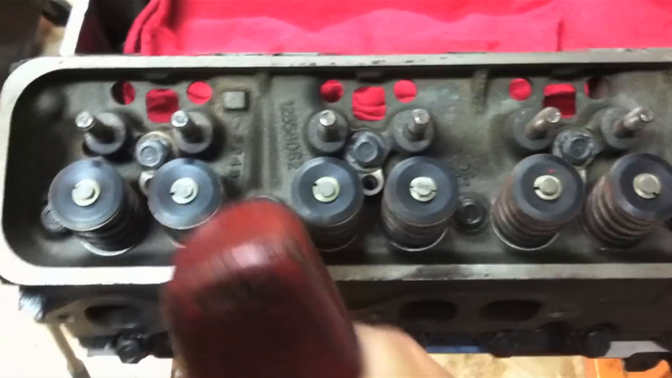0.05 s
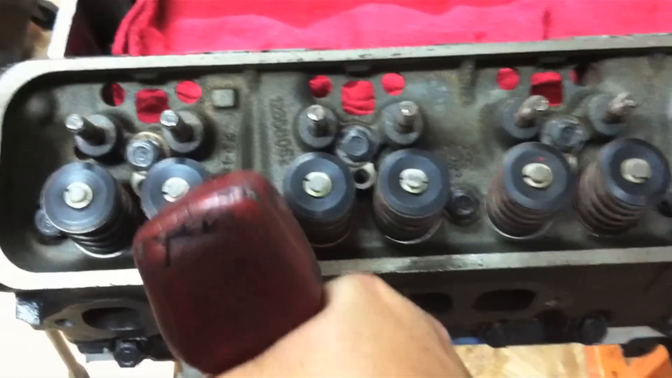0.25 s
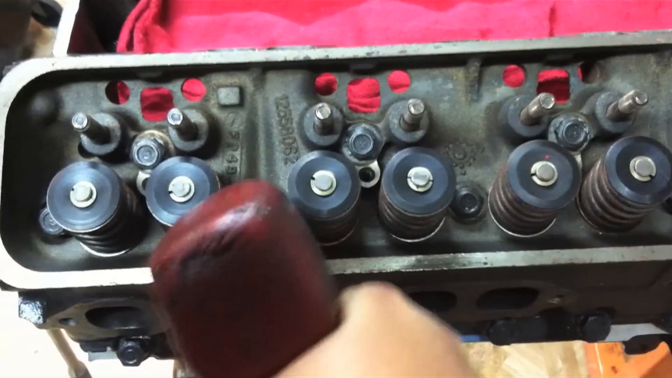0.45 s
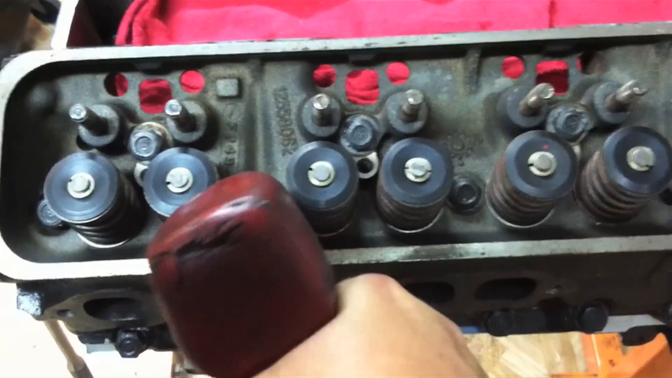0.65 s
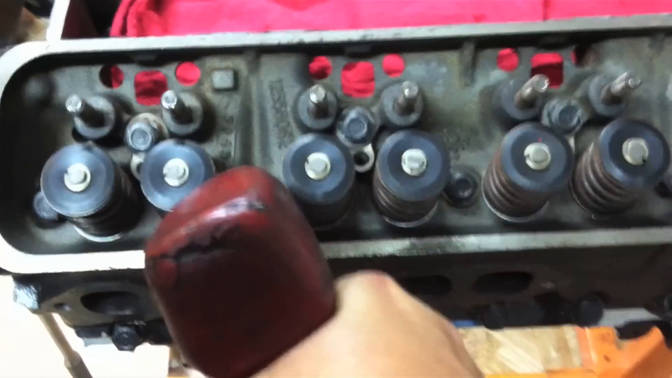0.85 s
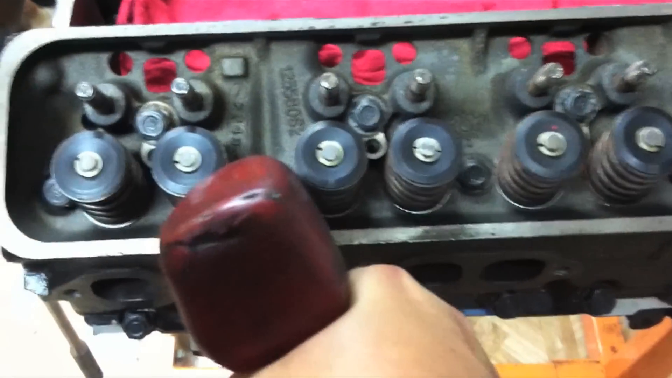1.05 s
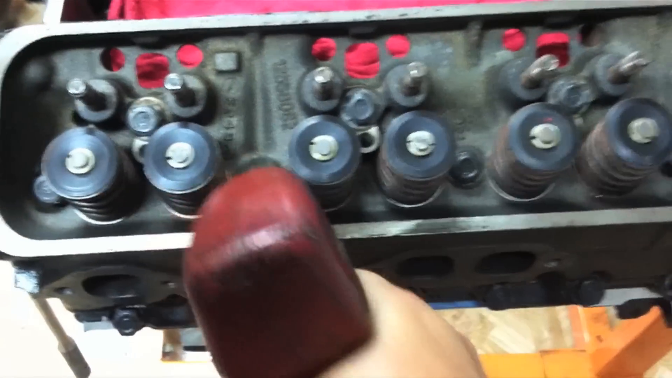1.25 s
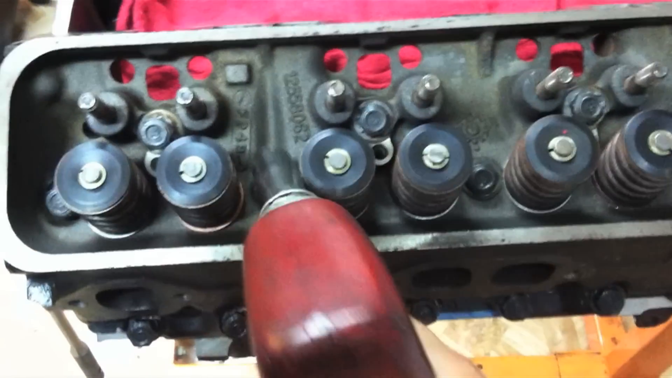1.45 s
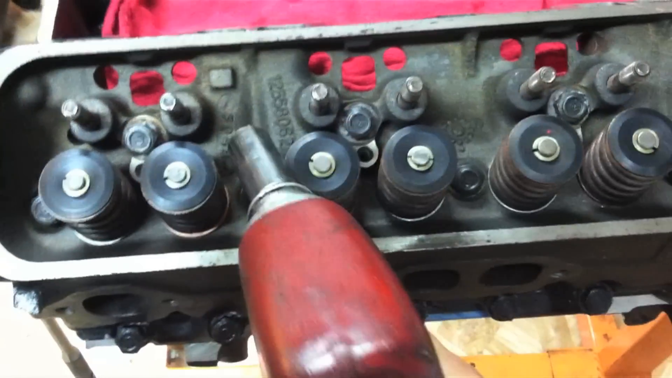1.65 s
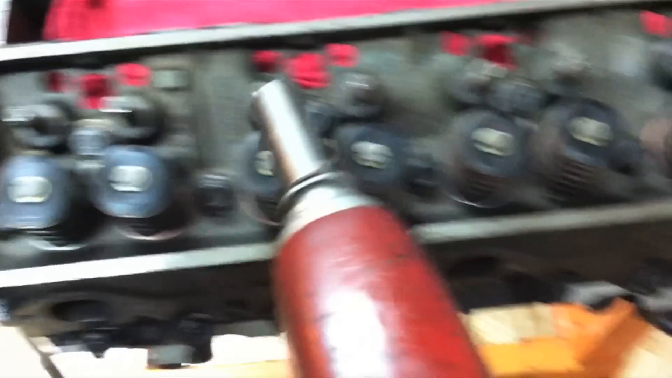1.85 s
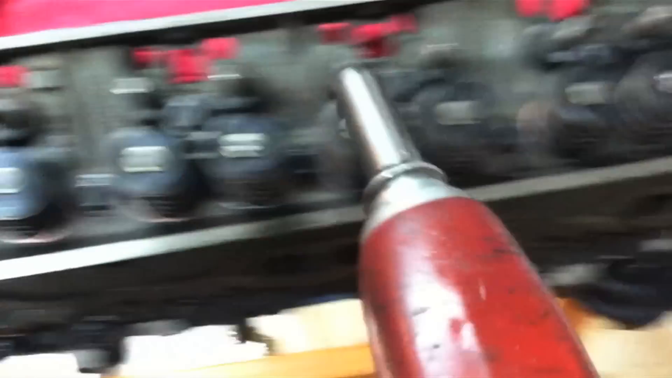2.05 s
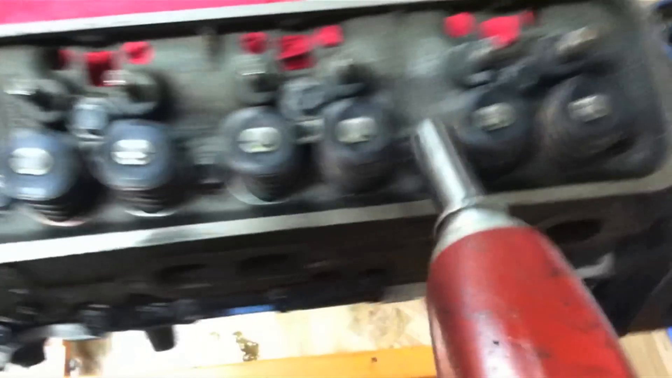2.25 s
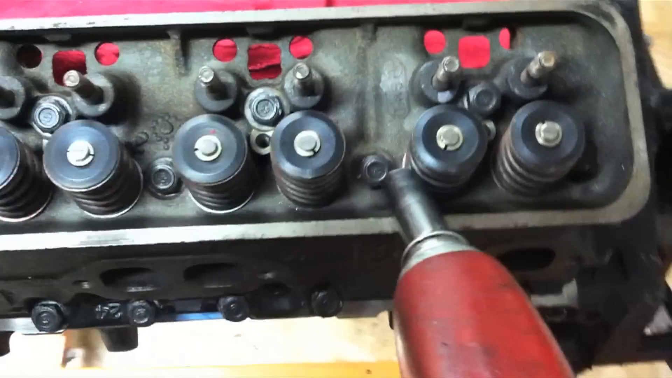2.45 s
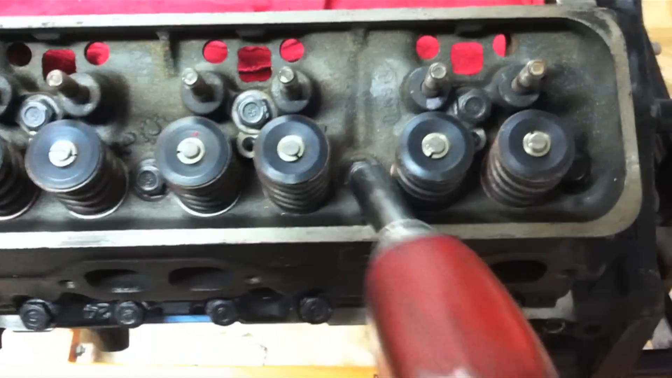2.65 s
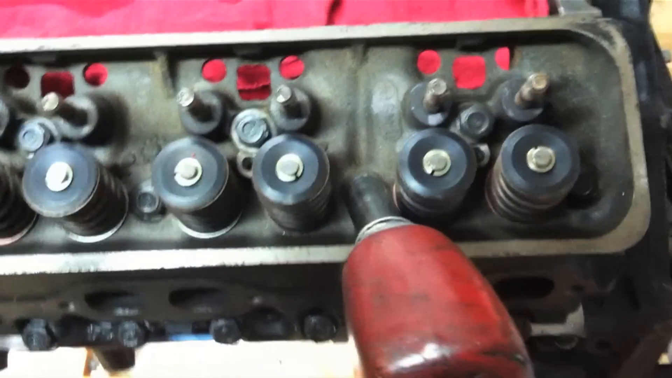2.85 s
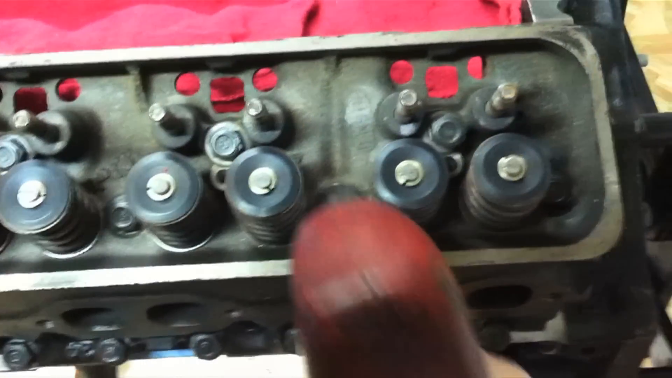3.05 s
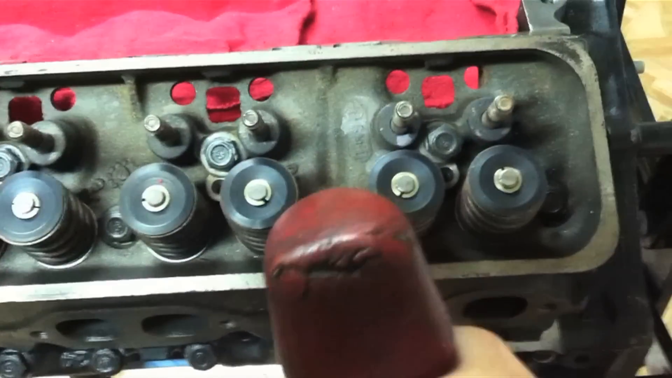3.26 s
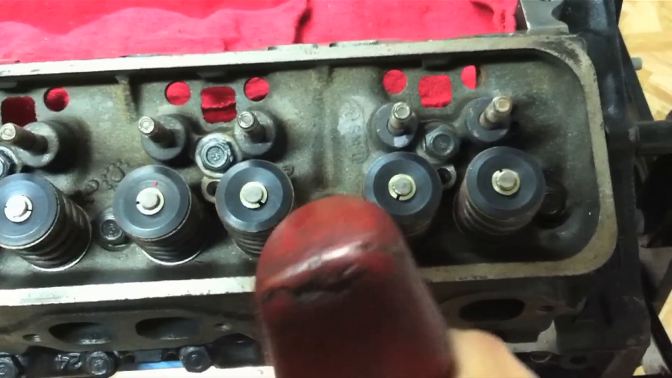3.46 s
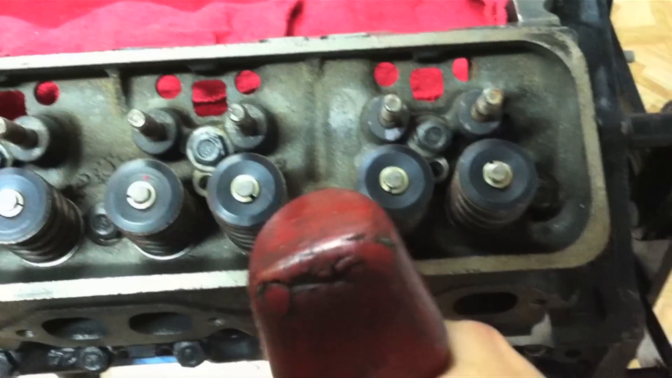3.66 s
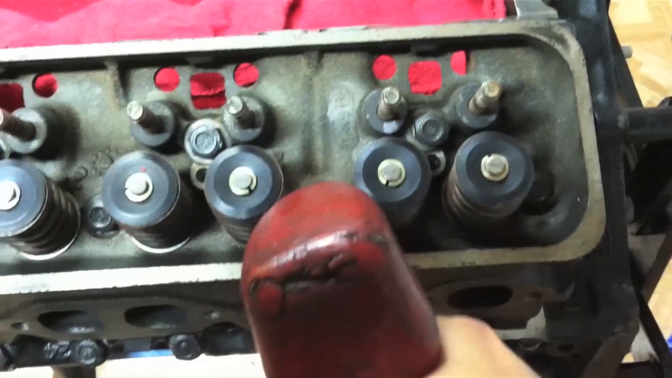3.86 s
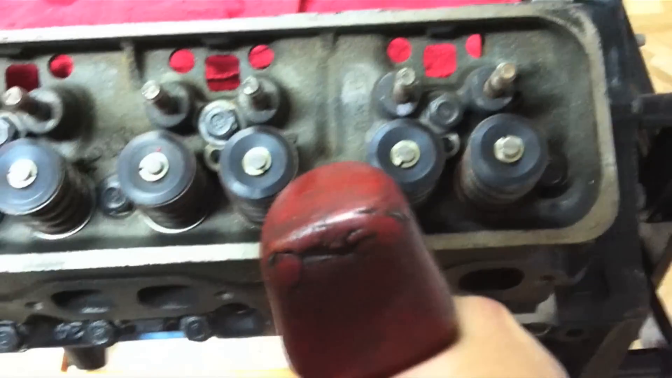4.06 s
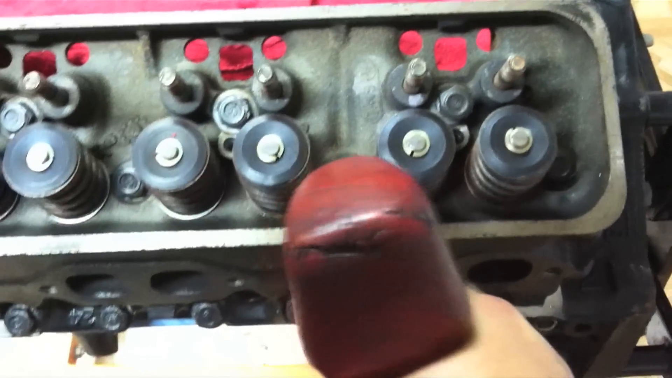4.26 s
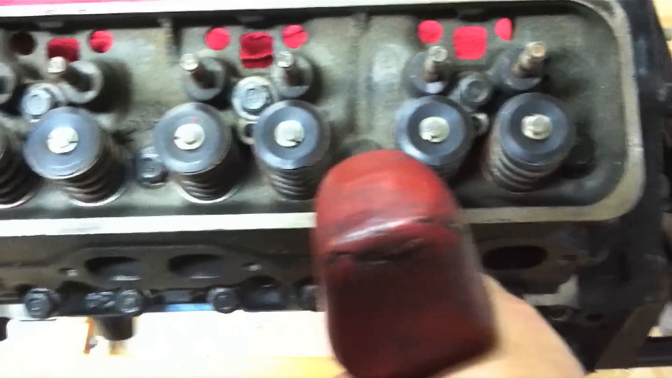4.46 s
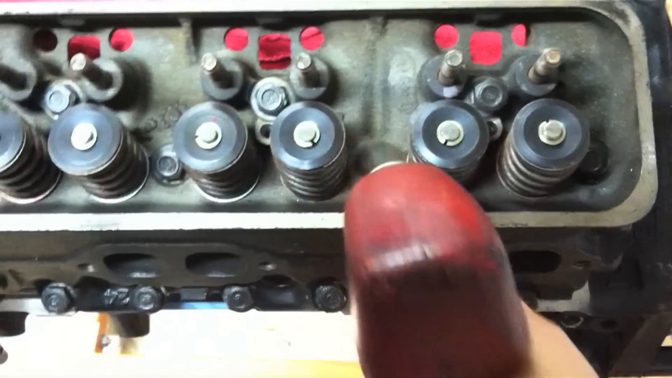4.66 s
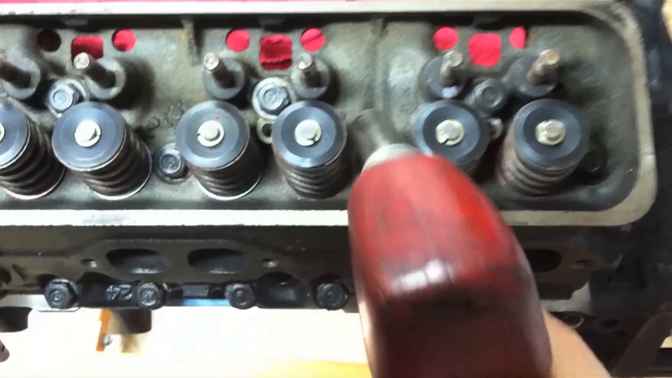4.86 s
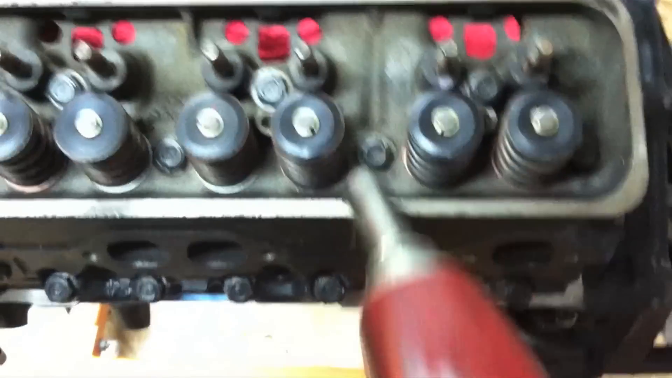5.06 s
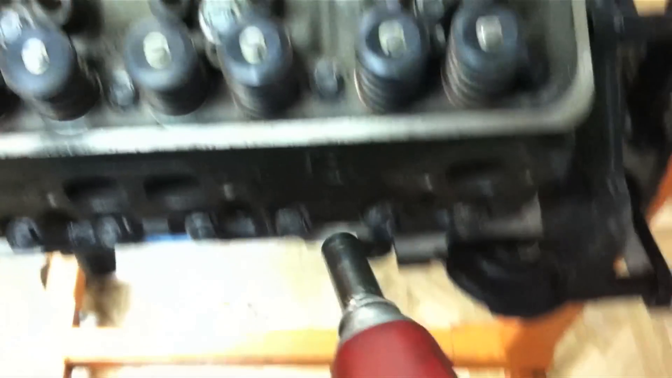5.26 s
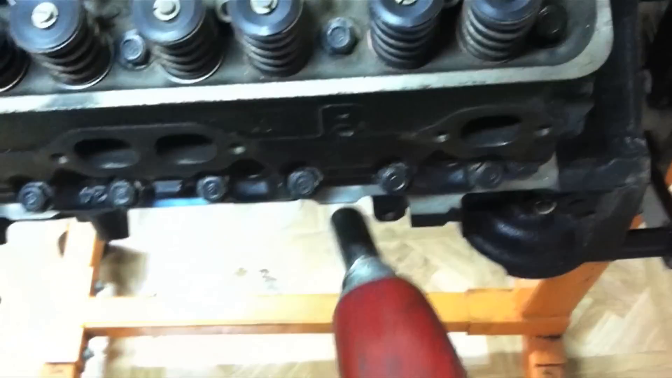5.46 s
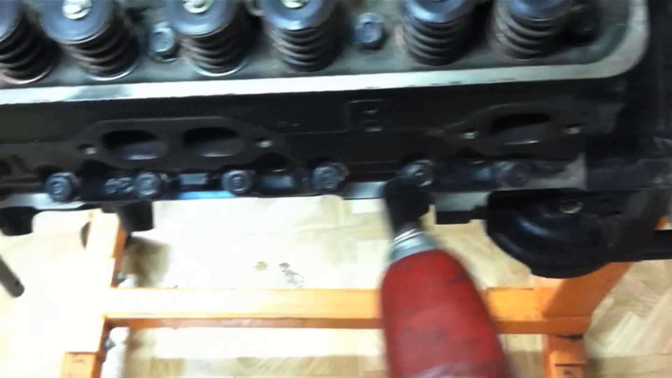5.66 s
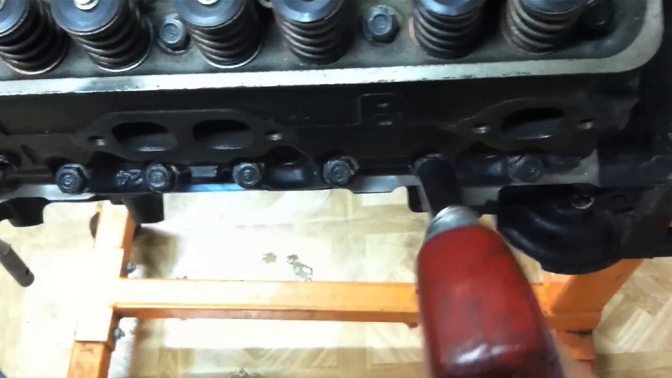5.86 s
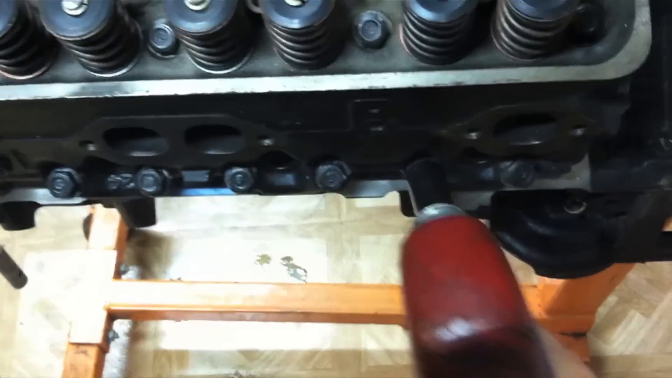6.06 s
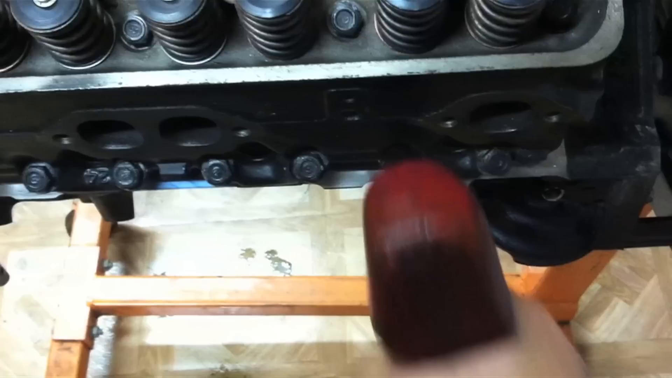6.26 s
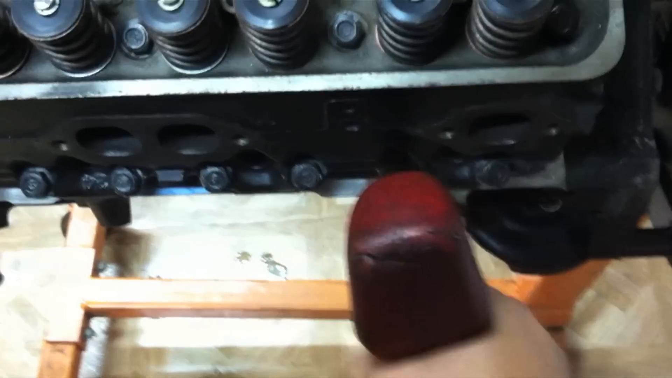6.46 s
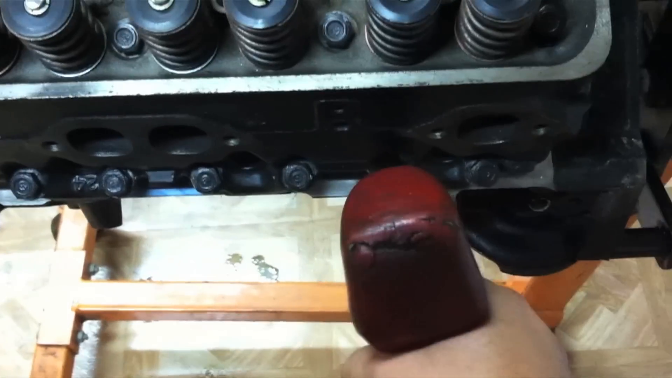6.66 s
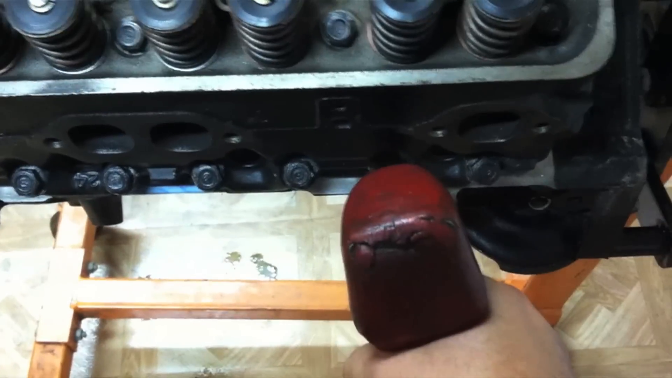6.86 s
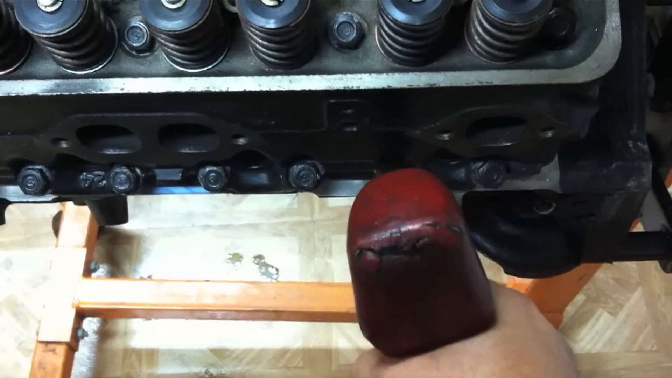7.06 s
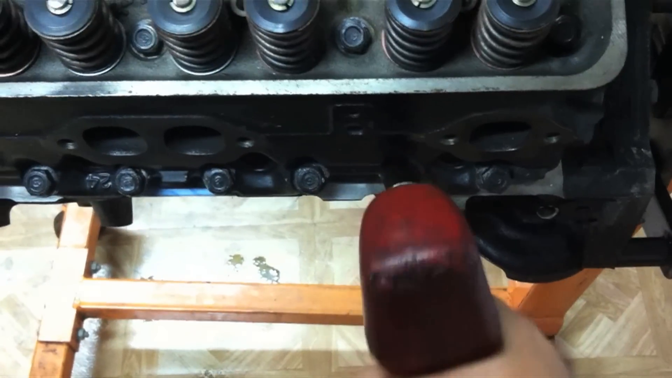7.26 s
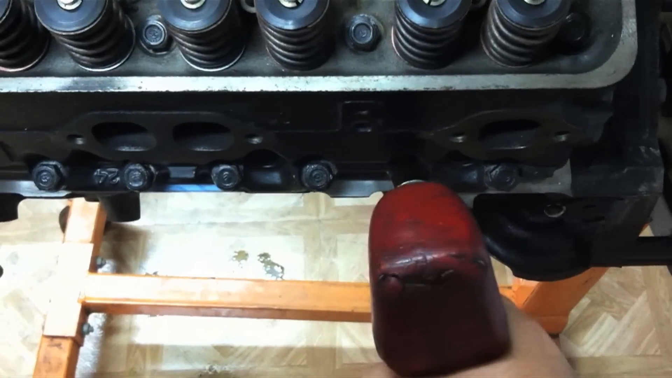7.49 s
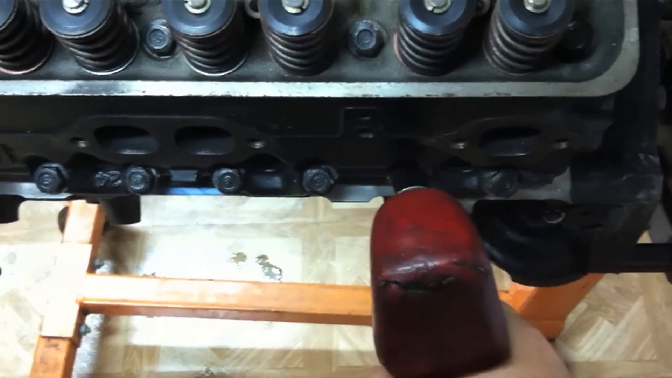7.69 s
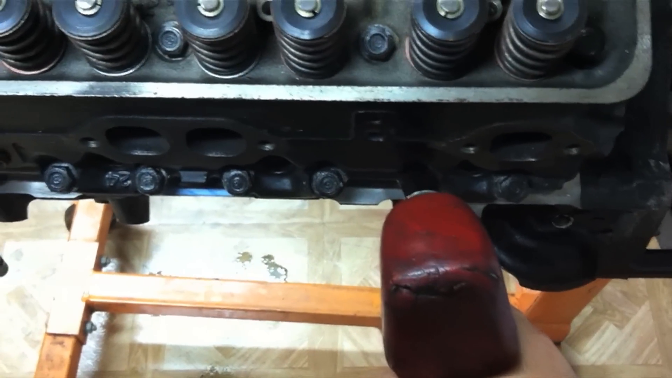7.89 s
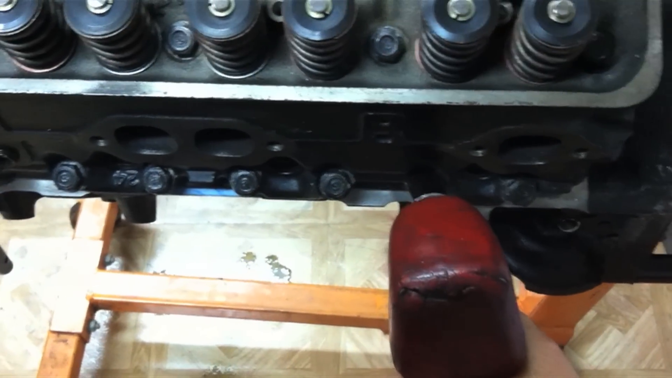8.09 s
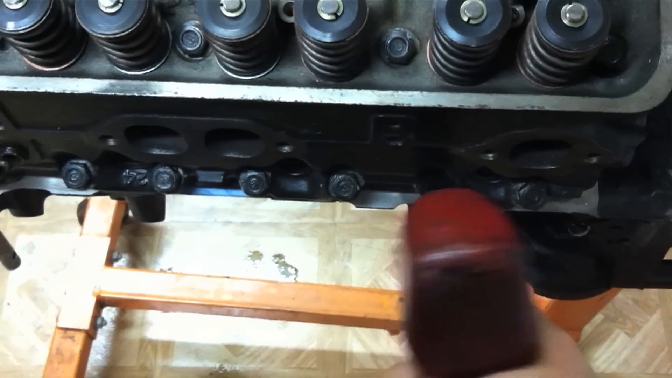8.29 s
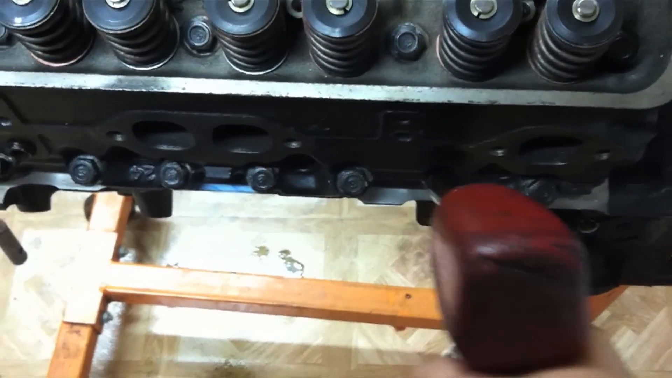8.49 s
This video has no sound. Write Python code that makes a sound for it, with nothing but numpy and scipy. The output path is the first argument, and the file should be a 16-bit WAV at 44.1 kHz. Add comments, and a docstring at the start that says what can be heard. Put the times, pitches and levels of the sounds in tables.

```python
"""Air wrench on three bolts

An air impact wrench works on three cylinder-head bolts in a garage, close to the microphone.
Each pull whirls up the vane motor, a wavering tone with a rush of exhaust, and the hammer rattles on the anvil.
The blows are short noise bursts and thuds; the valve springs and the room ring on after them.
Between bursts the socket clinks on iron, air seeps and the hose slides softly, over a low hum and rumble.
"""
import sys
import numpy as np
from scipy import signal
from scipy.fft import rfft, irfft
from scipy.io import wavfile

SR = 44100
rng = np.random.default_rng(int(sys.argv[2]) if len(sys.argv) > 2 else 0)


def transcribe(u):
    """Save the signal u as a 16-bit wav file named by the first command-line argument.

    u: samples, shape (n,) or (channels, n), limited to [-1, 1]; the rate is SR.
    q: integer samples, one column per channel.
    """
    v = np.clip(np.atleast_2d(u).T, -1, 1)
    q = np.round(v * 32767).astype(np.int16)
    wavfile.write(sys.argv[1], SR, q)


N = 376173
TIME = np.arange(N) / SR


def from_db(db):
    """Turn decibels into a gain."""
    return 10 ** (np.asarray(db) / 20)


def rms_one(x):
    """Scale to rms 1."""
    return x / np.sqrt(np.mean(x ** 2) + 1e-20)


def in_time(rows):
    """Read each column of a time curve at every sample."""
    s, *columns = np.transpose(rows)
    return [np.interp(TIME, s, c) for c in columns]


def at_hz(points, hz):
    """Read a curve over frequency, on a logarithmic frequency axis."""
    known_hz, values = np.transpose(points)
    return np.interp(np.log(np.maximum(hz, 1)), np.log(known_hz), values)


def convolve(x, response):
    """Pass x through an impulse response."""
    return signal.fftconvolve(x, response)[:N]


def coloured(x, spectrum, size=4096):
    """Filter that answers at once (minimum phase) with this spectrum; white noise keeps its level."""
    level_db = at_hz(spectrum, np.fft.rfftfreq(size, 1 / SR))
    cepstrum = irfft(np.log(from_db(level_db)))
    # folding the second half onto the first makes the filter causal
    cepstrum[1:size // 2] *= 2
    cepstrum[size // 2 + 1:] = 0
    response = irfft(np.exp(rfft(cepstrum)))
    return convolve(x, response / np.linalg.norm(response))


def noise():
    """White noise."""
    return rng.standard_normal(N)


def drift(per_s):
    """Random wandering with rms 1: straight lines between this many random points per second."""
    knots = np.arange(0, TIME[-1] + 1, 1 / per_s)
    return rms_one(np.interp(TIME, knots, rng.standard_normal(len(knots))))


def clicks(times, sizes):
    """One impulse per event."""
    out = np.zeros(N)
    places = np.round(np.asarray(times) * SR).astype(int)
    np.add.at(out, np.clip(places, 0, N - 1), sizes)
    return out


def crash(strikes, t60):
    """Each strike wakes a crowd of dense modes: noise that dies away."""
    keep = from_db(-60 / (t60 * SR)) ** 2   # share of the energy left after one sample
    energy = signal.lfilter([1], [1, -keep], strikes ** 2 + 1e-18)
    return np.sqrt(energy) * noise()


def resonance(x, hz, width_hz):
    """Two-pole band-pass with gain 1 at its peak."""
    r = np.exp(-np.pi * width_hz / SR)
    top = np.array([1, 0, -1]) * (1 - r * r) / 2
    bottom = [1, -2 * r * np.cos(2 * np.pi * hz / SR), r * r]
    return signal.lfilter(top, bottom, x + 1e-18)


# one pull of the trigger per bolt: (pressed [s], released [s], valve opening time [s],
# time until the hammer bites [s], and relative levels: air flow [dB], motor tone [dB],
# recoil [dB], socket ring [dB])
BURSTS = [(0.262, 1.103, .018, 0.15, -20, -35.5, -1.5, 1.5),
          (3.274, 4.193, 0.013, 0.13, -20, -35.5, -0.5, -1),
          (6.335, 7.063, 0.018, 0.12, -19.5, -36, 4.5, -8.5)]
# the speed that each bolt allows the motor as it tightens: (time [s], speed [vane passes per s])
LOAD_1 = [(.42,590),(0.488,540),(.57,600),(0.679,538),(.86,481),(.92,504),(1.1,465),(1.16,376),(1.3,360)]
LOAD_2 = [(3.451,598),(3.52,508.2),(3.59,559.3),(3.69,571.9),(3.91,464.5),(3.98,506.9),(4.07,474),(4.181,477.8),(4.3,430)]
LOAD_3 = [(6.49,602),(6.6,438.8),(6.68,487.7),(6.8,424),(6.88,458.6),(6.92,425),(6.97,469.4),(7.04,425.3),(7.2,433)]
# blows that stand out of the rattle, and the last ones as the rotor coasts:
# (time [s], relative crack level [dB], relative thud level [dB])
BLOWS = [(0.279,-22,-34.5), (0.312,-15.5,-16), (0.322,-14.5,-30), (0.5186,-14.5,-27.5),
         (0.7974,-15.5,-22.5), (0.8311,-20.5,-19), (0.8584,-18.5,-17.5), (0.8874,-17.5,-23),
         (1.079,-16,-23), (1.1213,-16.5,-34), (1.1496,-16,-41.5), (1.202,-27.5,-44), (3.309,-15,-19.5),
         (3.324,-17,-22), (3.585,-13,-26), (3.725,-19.5,-21.5), (3.7844,-14.5,-17), (3.8683,-15,-23),
         (3.9041,-15.5,-21), (3.9448,-19.5,-26), (3.9822,-15,-21.5), (4.0217,-23,-16.5), (4.0414,-13,-22),
         (4.1977,-17,-33), (4.218,-19.5,-20), (4.246,-23,-30), (4.288,-25,-37), (6.359,-18,-25.5),
         (6.376,-20,-15), (6.391,-14,-21), (6.5256,-25.5,-16.5), (6.5475,-15,-15), (6.6155,-17,-13.5),
         (6.6542,-23,-17.5), (6.665,-24.5,-17.5), (6.674,-16,-17), (6.7747,-20,-18.5), (6.7956,-24.5,-16),
         (6.8247,-19,-15), (6.982,-16,-19.5), (7.0062,-21,-16), (7.0207,-15,-15), (7.061,-15,-16),
         (7.0812,-13.5,-18)]
# the rotor spins up along an S-curve from the first speed (vane passes per s)
KICK_HZ, SPIN_UP_S, SPIN_UP_SHAPE = 134.9, .068, 2.5
FLUTTER, FLUTTERS_PER_S = .015, 45   # the motor's speed flutters at random, by this share
SURGE_DB = 4.5   # extra air until the hammer bites
# the tone is strong in the spin-up and again as the bolt comes tight
TONE_SURGE_DB, TONE_STRAIN_DB, STRAIN_S = 10, 5, 0.36
AIR_FADE_S, TONE_FADE_S = 0.022, .045   # fade after release
AIR_WAVER_DB, TONE_WAVER_DB, WAVERS_PER_S = 0.86, 3, 26


def burst(pull, load, bolt, free_air_db=5.5, loose_db=-6.5, slack_db=-9.0, tighten_s=.3):
    """One bolt: air surges before the hammer bites, then the recoil grows as the bolt tightens."""
    start, end, open_s, bite_s, air_db, tone_db, recoil_db, ring_db = pull
    age = np.maximum(TIME - start, 0)
    spin_up = 1 - np.exp(-(age / SPIN_UP_S) ** SPIN_UP_SHAPE)
    speed = KICK_HZ + (in_time(load)[0] - KICK_HZ) * spin_up
    flutter = 1 + FLUTTER * drift(FLUTTERS_PER_S)
    vanes = np.cumsum(speed * flutter * (TIME > start)) / SR   # vane passes so far

    unloaded = np.exp(-(age / bite_s) ** 4)   # 1 while spinning up, 0 once the hammer works
    strain = np.exp(-np.abs(TIME - end) / STRAIN_S)
    flow_db = air_db + SURGE_DB * unloaded + AIR_WAVER_DB * drift(WAVERS_PER_S)
    flow = trigger(start, end, open_s, AIR_FADE_S) * from_db(flow_db)
    whirl_db = tone_db + TONE_SURGE_DB * unloaded + TONE_STRAIN_DB * strain
    whirl_db = whirl_db + TONE_WAVER_DB * drift(WAVERS_PER_S)
    tone = trigger(start, end, open_s, TONE_FADE_S) * from_db(whirl_db)
    grip = from_db(recoil_db + slack_db * np.exp(-age / tighten_s))

    own_blows = np.array([blow for blow in BLOWS if start - .5 < blow[0] < end + .5])
    air = motor(vanes, flow * from_db(free_air_db * unloaded), tone)
    blow_force = flow * from_db(loose_db * unloaded)   # the hammer is still loose at first
    return air + hammer(vanes, blow_force, grip, own_blows, bolt, ring_db)


LEAK_DB = -31   # level at which the valve starts to open


def trigger(start, end, open_s, fade_s):
    """The air valve opens from a leak and stays open for the burst; then what it drives fades out."""
    opening = from_db(LEAK_DB * np.exp(-np.maximum(TIME - start, 0) / open_s))
    return (TIME > start) * opening * np.exp(-np.maximum(TIME - end, 0) / fade_s)


# colour of the exhaust rush: (frequency [Hz], level [dB per Hz])
EXHAUST = [(59, -50), (100, -20), (271, -13), (349, -6), (580, -4), (702, -7), (814, -9.5), (886, -13),
           (4070, -0.5), (5840, -7.5), (10600, -5), (12500, -14.5), (15800, -33.5)]


def motor(vanes, flow, tone, rush_db=-8.0, chop=0.35, tone_db=-3.0, second_db=-9.0, third_db=-19.5,
          rough=0.4, body_hz=320, body_width_hz=110):
    """The vanes chop the exhaust: a wavering tone and a pulsing rush of air."""
    angle = 2 * np.pi * vanes + rough * drift(150)
    hum = np.sin(angle) + from_db(second_db) * np.sin(2 * angle) + from_db(third_db) * np.sin(3 * angle)
    rush = coloured(noise() * flow * (1 + chop * np.cos(angle)), EXHAUST)
    whirl = from_db(tone_db) * tone * np.sqrt(2) * hum * (1 + rough * drift(90))
    # the rising tone sweeps through the housing's resonance
    groan = resonance(resonance(whirl, body_hz, body_width_hz), body_hz, body_width_hz)
    return from_db(rush_db) * rush + whirl + groan


# clatter of tool, socket and head on each bolt: (frequency [Hz], level [dB per Hz])
BOLT_1 = [(290, -31.5), (500, -3), (630, -18), (841, -7), (1030, -6), (1460, -6.5), (2960, -1.5),
          (3180, -3.5), (4760, 0), (5660, -4.5), (7140, -6), (11300, -10.5), (12200, -6.5), (14500, -20),
          (15800, -31)]
BOLT_2 = [(290, -38), (500, -3.5), (639, -17.5), (805, -7), (986, -4), (1730, -4), (3040, -0.5), (3320, -1),
          (4690, 0.5), (5270, -3.5), (7140, -3.5), (8250, -8), (12500, -6.5), (14700, -19), (15800, -27)]
BOLT_3 = [(290, -29), (500, -8), (829, -8.5), (1460, -5), (1810, -5.5), (2180, -3), (2490, -5),
          (4560, -2.5), (5120, 0.5), (5830, -4), (6640, -1.5), (8370, -8), (9260, -5.5), (12500, -8),
          (15800, -27)]


def hammer(vanes, flow, grip, blows, bolt, ring_db, jitter_s=0.00054, spread_db=2.0, light_db=2.5,
           weak_db=-2.0, hard_db=2.5, t60=0.024, rebound_s=0.003, rebound_db=-2.0, light_thud_db=-16.5,
           bite_share=.45, bite_db=3.0, bite_thud_db=-6.5, thud_spread_db=2.5):
    """A blow falls every fourth vane pass; some bite harder and kick the tool, every third only glances."""
    at = np.flatnonzero(np.diff(vanes // 4) > 0)
    chance = rng.standard_normal((len(at), 4))
    s = at / SR + jitter_s * chance[:, 0]
    hard_s, crack_db, thud_db = blows.T
    # regular blows leave room (6 ms) for the listed ones
    free = np.abs(s[:, None] - hard_s).min(axis=1) > .006
    glancing = np.arange(len(at)) % 3 == 0
    bites = ~glancing & (rng.random(N)[at] < bite_share)

    size = free * flow[at] * from_db(spread_db * chance[:, 1] + weak_db * glancing)
    first = clicks(s, size * from_db(light_db + bite_db * bites))
    first = first + clicks(hard_s, from_db(crack_db + hard_db))
    # regular blows that do not bite rebound once
    rebound_times = s + rebound_s * from_db(2 * chance[:, 2])
    rebound = clicks(rebound_times, size * ~bites * from_db(rebound_db))
    steel = socket_ring(coloured(crash(first + rebound, t60), bolt), ring_db)

    kick_db = np.where(bites, bite_thud_db, light_thud_db) + thud_spread_db * chance[:, 3]
    kicks = clicks(s, size * grip[at] * from_db(kick_db)) + clicks(hard_s, from_db(thud_db))
    return steel + thud(kicks)


# resonances of socket and anvil: (frequency [Hz], width [Hz], relative level [dB])
SOCKET = [(2880, 44, -10), (4020, 62, -9), (4880, 180, -9.5), (7100, 200, -12.5), (9400, 150, -18.5),
          (12100, 200, -6.5)]


def socket_ring(x, ring_db):
    """The steel socket adds its own short resonances."""
    return x + sum(from_db(db + ring_db) * resonance(x, hz, width) for hz, width, db in SOCKET)


# colour of the thud of a blow through the tool body: (frequency [Hz], level [dB per Hz])
THUD = [(30,-42),(60,-24.5),(100,-10),(160,1),(320,-1.5),(500,-4),(900,-11.5),(1600,-16.5),(4000,-38.5)]


def thud(strikes, push_db=17.5, shake_db=-3.5, t60=.035):
    """The recoil is one push on the tool body, which then shakes briefly."""
    return coloured(from_db(push_db) * strikes + from_db(shake_db) * crash(strikes, t60), THUD)


# the socket touches bolt or head: (time [s], relative strength [dB],
# knock relative to that strength [dB], brightness limit [Hz])
TOUCHES = [(0.1477,-10.5,-10,11900),(2.4326,-31,-26,12000),(2.5624,-43.5,-17,12000),(2.6442,-34.5,-19.5,11930),(2.656,-35.5,-22.5,8954),(2.6804,-30.5,-30,12000),(2.725,-41,-23,8980),(3.0079,-36.5,-20,10930),(3.02,-43,-23,9040),(3.1137,-18,-14.5,11980),(3.1202,-27.5,-20,8940),(5.8245,-40,-22.5,14260),(5.873,-39,-23,14030),(5.908,-44,-20,11040),(6.2857,-25.5,-3,9070),(8.089,-46,-18,2570),(8.2766,-49,-15,5900),(8.3247,-40,-17.5,2386)]
# colour of the clink: (frequency [Hz], level [dB per Hz])
CLINK = [(150,-14),(350,4),(800,-2.5),(1400,-2.5),(2400,0.5),(4600,0.5),(6000,-7.5),(8000,-7.5),(10500,-13),(12300,-11.5),(13300,-17),(15500,-30.5)]
# the socket's own high ping when it is tapped
PING_HZ, PING_WIDTH_HZ, PING_DB = 12300, 60, 13.0


def socket_touches(clink_db=-8.5, knock_db=-3.5, t60=0.031, firm_db=-20.0, longer_per_db=0.3,
                   knock_low_hz=130):
    """Steel meets iron: a clink, shorter when the touch is soft, with a ping and a knock under it."""
    clink = 0
    for s, strength_db, rel_db, bright_hz in TOUCHES:
        dull = signal.butter(2, min(bright_hz, .45 * SR), fs=SR, output="sos")
        lasts = t60 * from_db(longer_per_db * (strength_db - firm_db))
        strike = clicks([s], from_db(strength_db + clink_db))
        clink = clink + signal.sosfilt(dull, crash(strike, lasts))
    clink = coloured(clink, CLINK)
    ping = from_db(PING_DB) * resonance(clink, PING_HZ, PING_WIDTH_HZ)

    s, strength_db, rel_db, bright_hz = np.transpose(TOUCHES)
    knock = thud(clicks(s, from_db(strength_db + rel_db + knock_db)))
    low_cut = signal.butter(2, knock_low_hz, "high", fs=SR, output="sos")
    return socket_ring(clink, ring_db=-5.5) + ping + signal.sosfilt(low_cut, knock)


# how strongly the springs' crowd of modes rings: (frequency [Hz], level [dB])
SPRINGS = [(1800,-16),(2300,-0.5),(2550,2),(2800,-0.5),(3400,-5),(3900,-5),(4300,-12),(4950,-4.5),(5350,-5.5),(5650,4),(6000,1.5),(6400,-13),(7900,-3.5),(12000,-21)]
# the springs' clearest notes: (frequency [Hz], level [dB], time to fall 60 dB [s])
SPRING_NOTES = [(2315,-3,1.5),(2396,-5,1.5),(2552,-0.5,1.4),(2600,-5,1.3),(3036,-5.5,1.4),(3386,-6,1.2),(3880,-0.5,1.1),(4940,-9,1.4),(5600,-7.5,1.5),(5733,-5.5,1.5),(5911,-4,1.6),(7736,-8.5,1.4)]


def valve_springs(x, crowd_db=-29.0, t60=1.5):
    """Shaken through the head, the springs sing on: a few clear notes in a crowd of modes."""
    t = TIME[:SR * 2]
    ring = rng.standard_normal(len(t)) * np.exp(-np.log(1000) * t / t60)
    crowd = coloured(convolve(x, ring / np.linalg.norm(ring)), SPRINGS)
    notes = 0
    for hz, db, decay_s in SPRING_NOTES:
        width_hz = np.log(1000) / np.pi / decay_s   # a longer ring is a narrower resonance
        notes = notes + from_db(db) * resonance(x, hz, width_hz)
    return from_db(crowd_db) * crowd + notes


# how long the garage echoes; a negative time makes the echo swell: (frequency [Hz], time for 60 dB [s])
ROOM_T60 = [(150,-0.1),(400,1),(1000,0.46),(2800,0.9451),(7000,.5),(14000,0.41)]
# how loud the echo is: (frequency [Hz], level [dB per Hz])
ROOM_DB = [(100,-25),(250,-15),(450,-12),(1000,-8),(3000,-7),(6000,-4),(10000,-3.5),(15000,-10.5)]


def garage(x, first_echo_s=0.0029, count=12):
    """Diffuse 2 s echo with its own rate in each band: most die away, the lowest swell until it ends."""
    t, response = TIME[:SR * 2], 0
    edges = np.geomspace(80, 16000, count + 1)
    for low, high in zip(edges, edges[1:]):
        hz = np.sqrt(low * high)
        fade = (t > first_echo_s) * np.exp(-np.log(1000) * t / at_hz(ROOM_T60, hz))
        echoes = rng.standard_normal(len(t)) * fade / np.linalg.norm(fade)
        band = signal.butter(2, [low, high], "band", fs=SR, output="sos")
        response = response + from_db(at_hz(ROOM_DB, hz)) * signal.sosfilt(band, echoes)
    return convolve(x, response)


# air seeps past the half-pressed trigger before a burst: (start time [s], level [dB])
SEEPS = [(0.152, -40.5), (3.118, -49)]
# colour of the seeping air: (frequency [Hz], level [dB per Hz])
SEEP = [(150,-14),(330,1),(850,-3),(1200,-10),(1600,-4),(2100,-10),(3200,2),(4500,-2),(5800,-13),(7600,-8),(12000,-16),(15500,-32)]
SEEP_FADE_S = .12


def seep():
    """A soft hiss of escaping air that dies down as the tool is settled on the bolt."""
    level = sum(from_db(db) * (TIME > s) * np.exp(-np.abs(TIME - s) / SEEP_FADE_S) for s, db in SEEPS)
    return level * coloured(noise(), SEEP)


# the air hose slides as the tool is carried about: (middle time [s], half length [s], level [dB])
SLIDES = [(0.11,0.025,-68), (1.89,0.11,-68.5), (2.065,.04,-67.5), (2.584,.13,-70.5), (2.92,.25,-68.5),
          (5.267,.13,-70.5), (5.501,0.21,-80), (6.23,.03,-74)]
# colour of the hiss of hose and background: (frequency [Hz], level [dB per Hz])
HISS = [(1500,-9.5),(2500,4.5),(5000,0),(6500,-4),(10500,-6.5),(12800,-10),(13800,-20.5),(15500,-30.5)]


def hose():
    """Each slide is a soft hiss that swells and fades."""
    level = sum(from_db(db) * np.exp(-((TIME - s) / half_s) ** 2) for s, half_s, db in SLIDES)
    return level * coloured(noise(), HISS)


# colour of the background rumble: (frequency [Hz], level [dB per Hz])
RUMBLE = [(15, -67), (25, -35), (32, -43.5), (62, -24), (154, -7.5), (271, -2.5), (309, -4.5), (373, 2.5),
          (404, -7), (2240, -21.5), (3180, -36.5), (4870, -38.5), (5720, -37.5), (9020, -40), (15000, -55)]
# notes of the hum: (frequency [Hz], level [dB])
HUM = [(163,-71.5),(188.4,-75),(376.8,-70.5),(759,-81.5),(900,-80.5)]
RUMBLE_LEVEL_DB, HISS_LEVEL_DB, SINK_DB, RECOVER_DB_PER_S = -57.0, -82.5, 7, 3.5


def background(waver=.6):
    """Low rumble, faint hiss and a wavering hum; rumble and hiss sink in each burst, then creep back."""
    sinks = []
    for start, end, *_ in BURSTS:
        left_db = np.clip(SINK_DB - RECOVER_DB_PER_S * (TIME - end), 0, SINK_DB)
        sinks.append((TIME > start) * left_db)
    sunk_db = np.max(sinks, axis=0)
    rumble = from_db(RUMBLE_LEVEL_DB) * coloured(noise(), RUMBLE)
    hiss = from_db(HISS_LEVEL_DB) * coloured(noise(), HISS)
    hum = 0
    for hz, db in HUM:
        angle = 2 * np.pi * hz * TIME + waver * drift(32)
        hum = hum + from_db(db) * np.sqrt(2) * np.sin(angle)
    return from_db(-sunk_db) * (rumble + hiss) + hum


def scene():
    """Tool and engine close by; from each new place the tool meets other echoes of the garage."""
    settings = zip(BURSTS, (LOAD_1, LOAD_2, LOAD_3), (BOLT_1, BOLT_2, BOLT_3))
    sounds = [burst(*each) for each in settings] + [socket_touches()]
    near = sum(sounds)
    springs = valve_springs(near)
    echoes = sum(garage(x) for x in sounds)
    mix = near + springs + echoes + seep() + hose() + background()
    return mix[None]


PEAK_LIMIT, CUTOFF_HZ = .58, 15750   # squashing limit before the top cut; upper end of the treble


def record(dry):
    """The loudest peaks are squashed, then the top of the treble is cut."""
    squashed = dry / (1 + (dry / PEAK_LIMIT) ** 4) ** .25
    top_cut = signal.ellip(12, .1, 80, CUTOFF_HZ, fs=SR, output="sos")
    return signal.sosfilt(top_cut, squashed)


dry = scene()
out = record(dry)
transcribe(out)
```